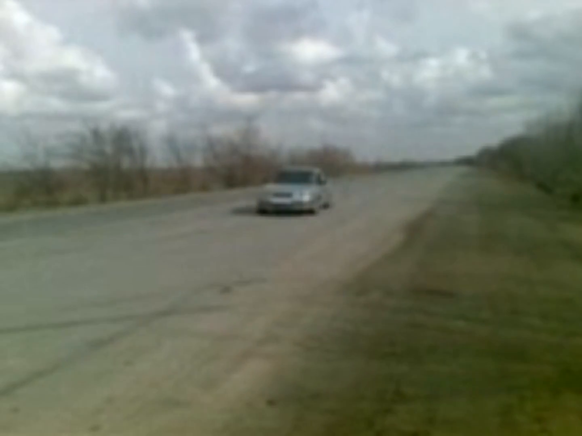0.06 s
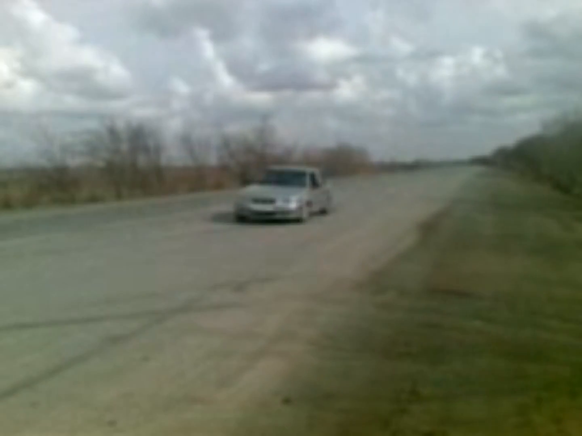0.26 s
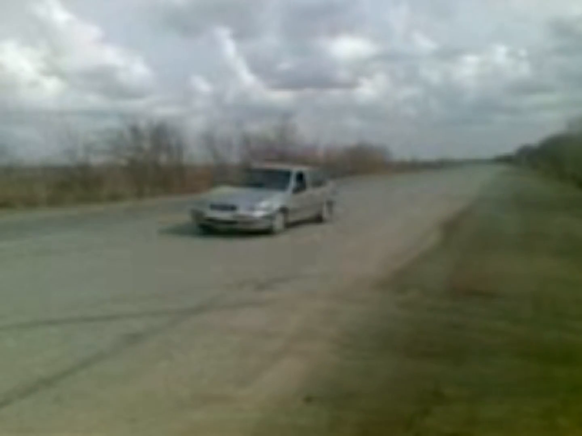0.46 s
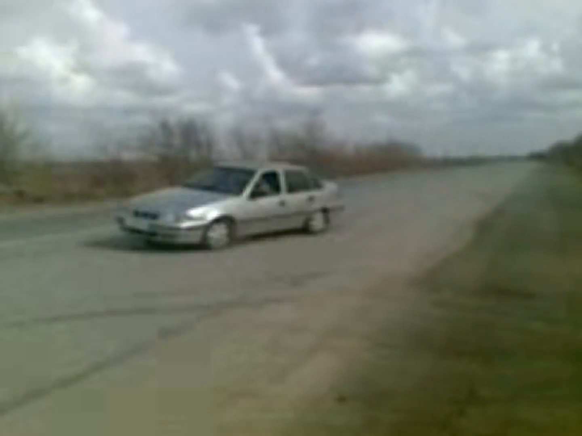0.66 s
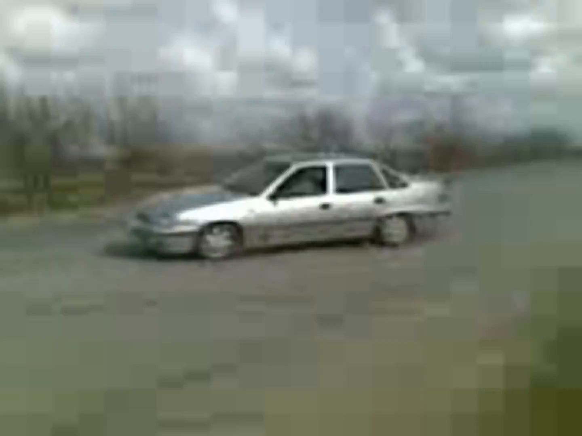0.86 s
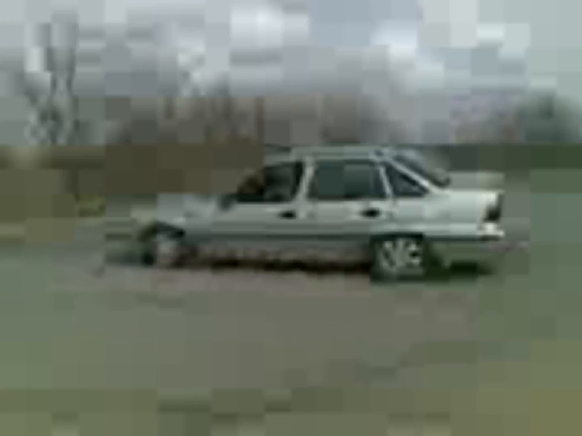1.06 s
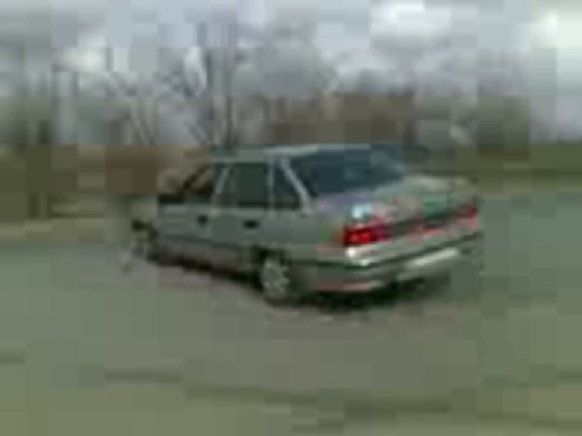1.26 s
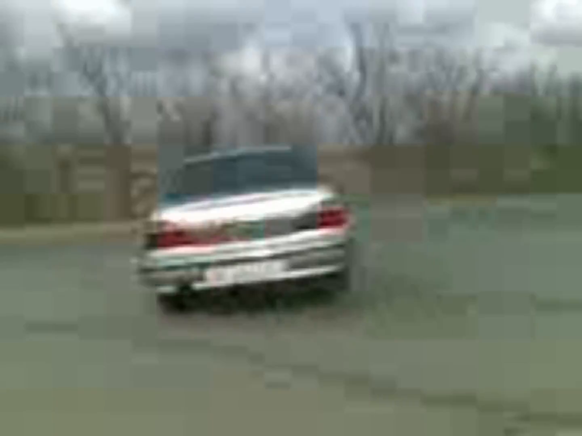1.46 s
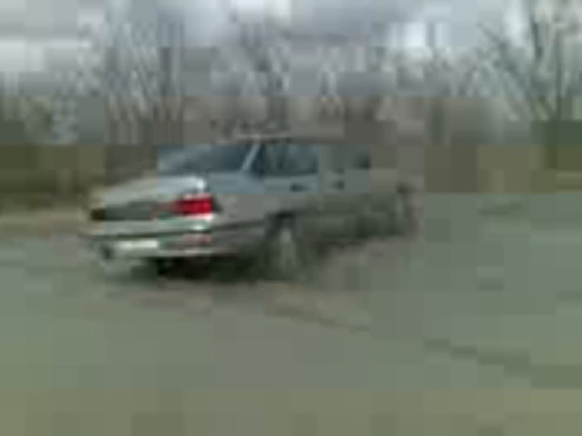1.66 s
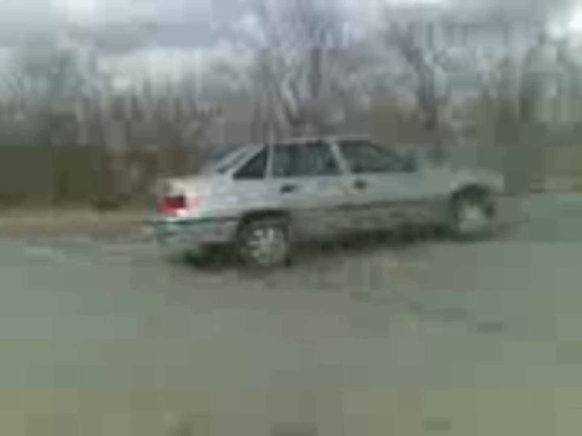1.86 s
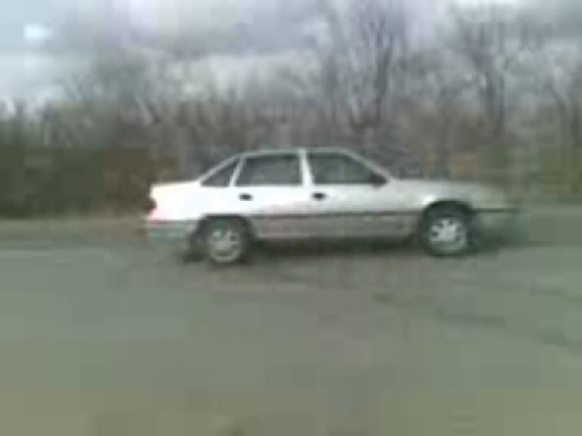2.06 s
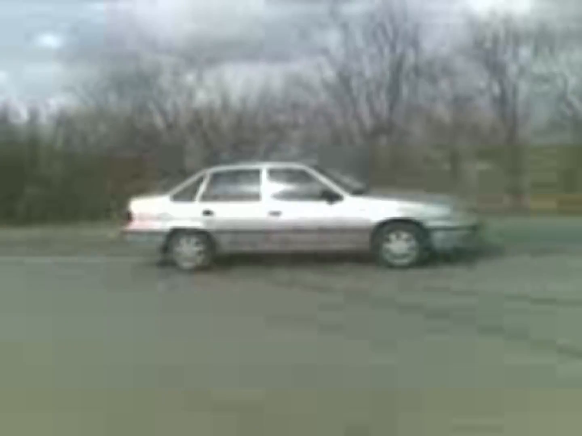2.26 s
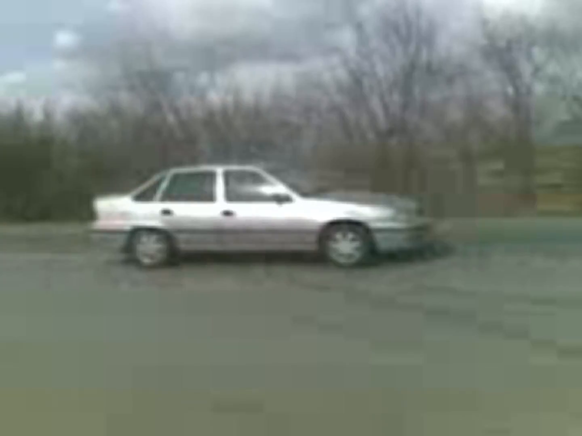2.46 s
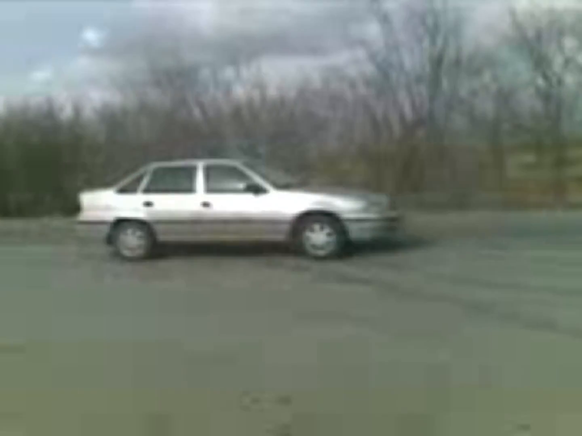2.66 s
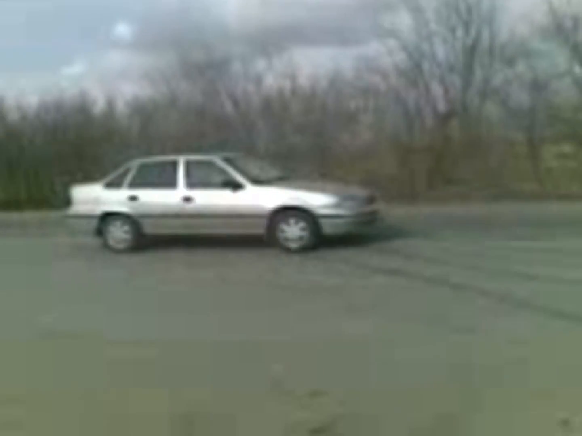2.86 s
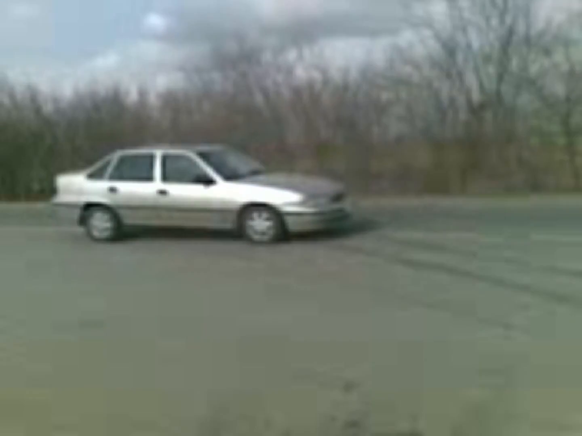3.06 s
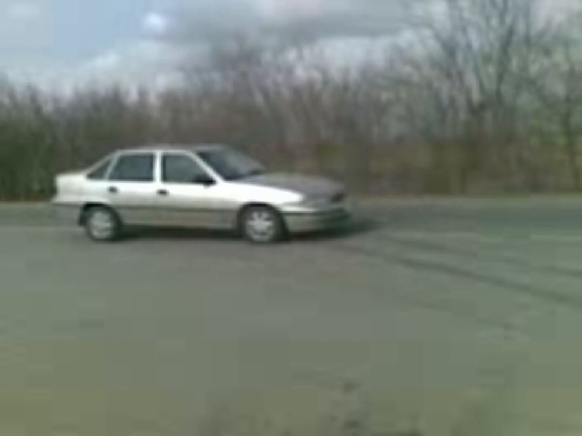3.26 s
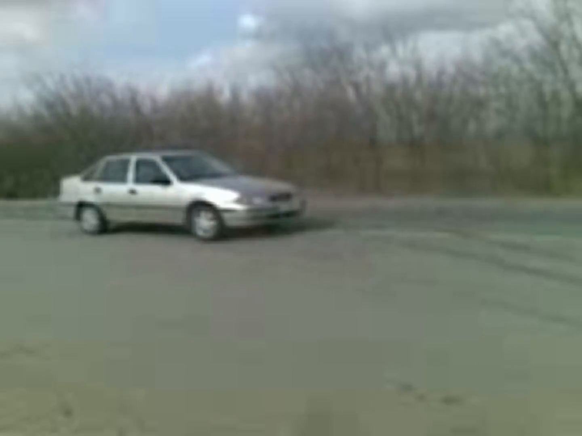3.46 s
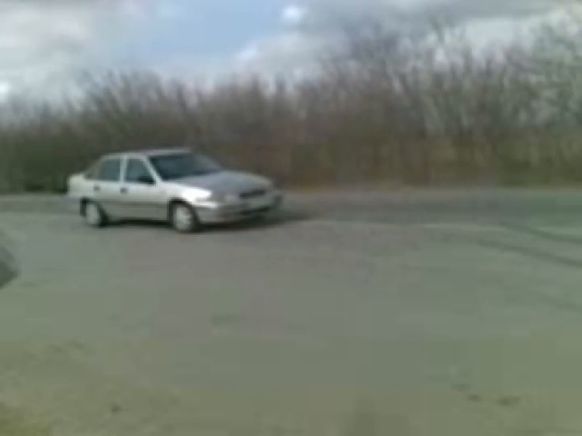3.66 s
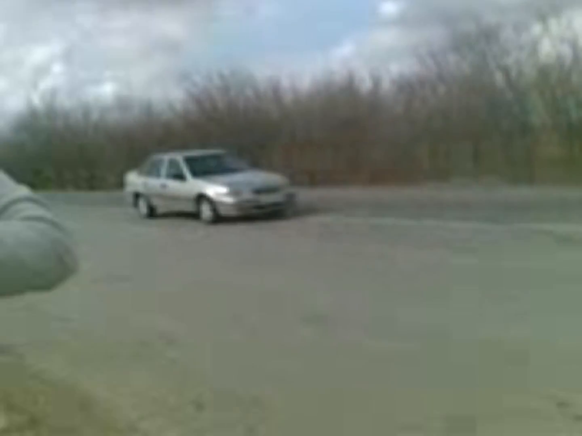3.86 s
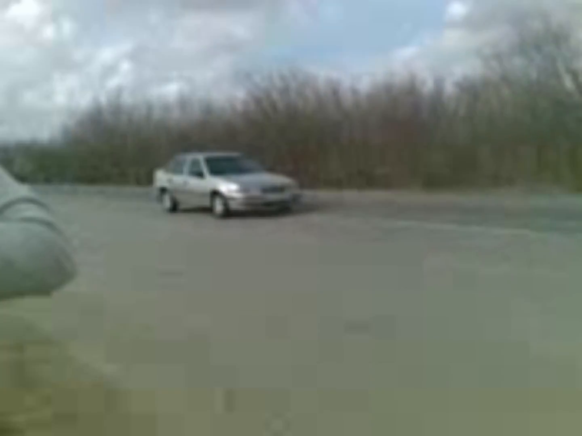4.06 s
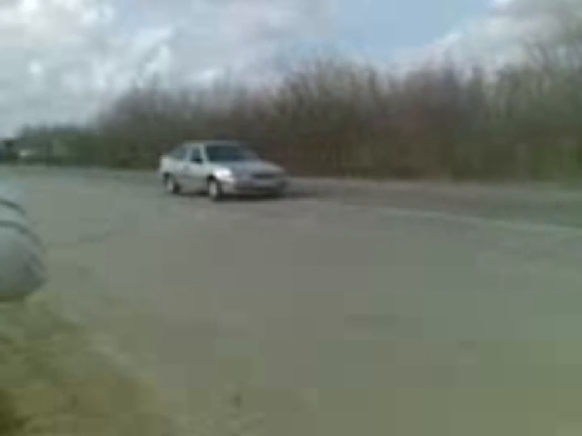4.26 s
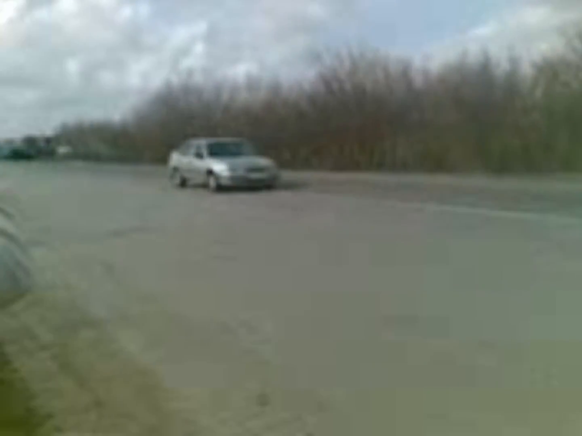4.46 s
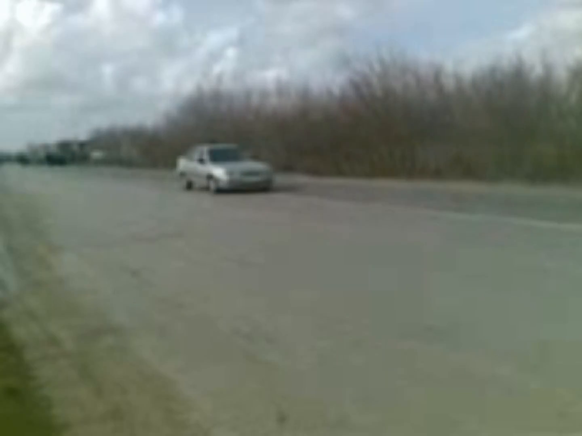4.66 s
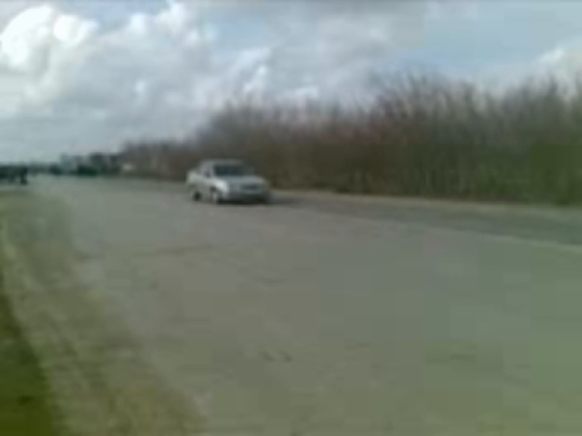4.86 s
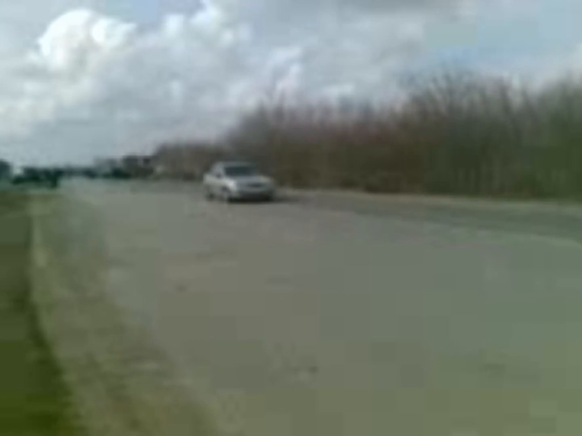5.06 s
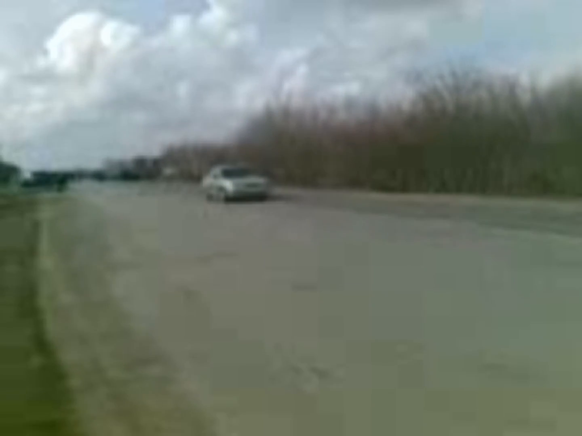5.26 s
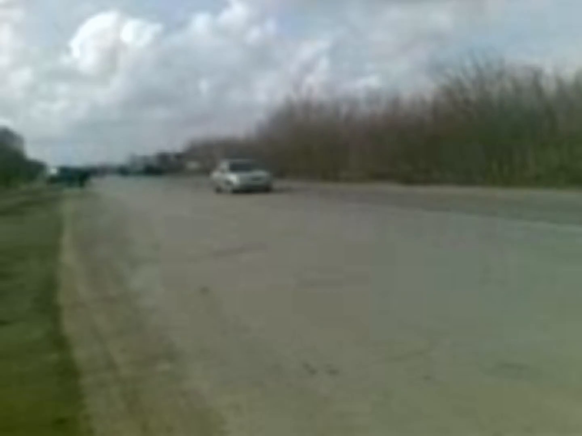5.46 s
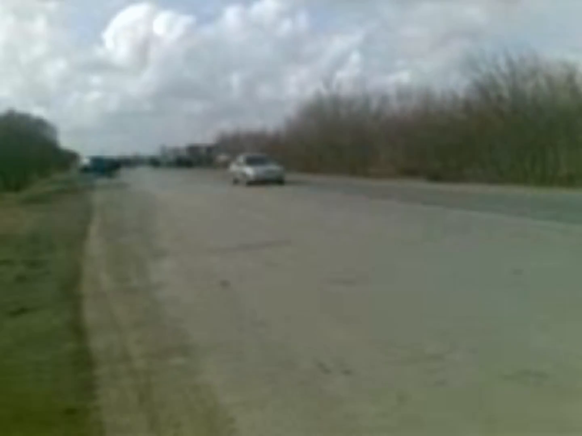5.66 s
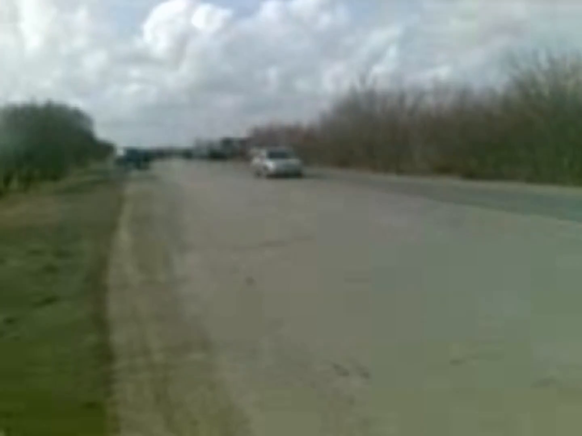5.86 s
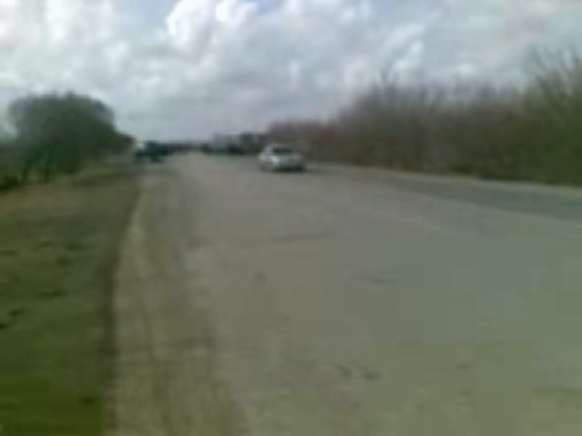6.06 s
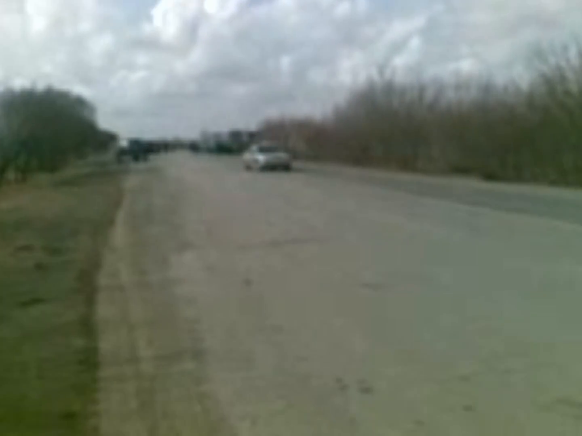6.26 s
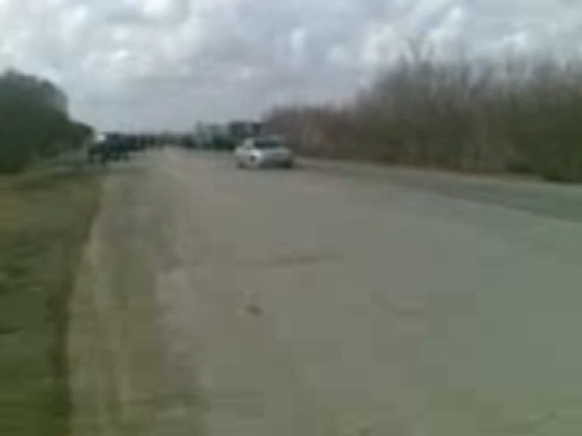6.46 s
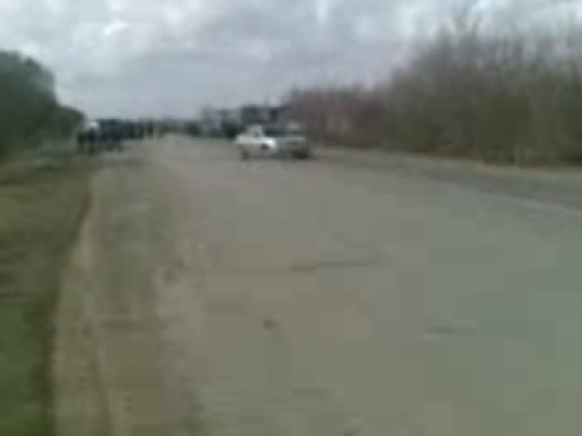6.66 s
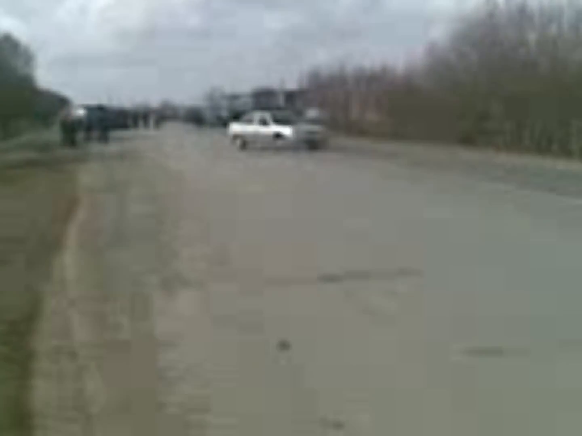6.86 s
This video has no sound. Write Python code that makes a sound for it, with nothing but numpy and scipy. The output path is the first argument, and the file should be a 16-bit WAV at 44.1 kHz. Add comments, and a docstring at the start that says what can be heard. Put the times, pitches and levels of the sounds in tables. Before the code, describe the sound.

Loud tyre screeching and rubbing fill the first two seconds, uneven and fluttering, with several short flares just before the stop. Quiet squeaks, scuffs and buzzy gear grabs follow, then a soft, flickering reverse whine climbs in pitch and thins out over faint road roll and engine hum. Near the end a squeal bursts in and sustains. Outdoors, dry, captured by a narrow-band camera microphone with gritty treble.

```python
"""Car spin and fast reverse

Tyres squeal and scrub in a spin on a country road: rubber slips ring briefly over shaped road noise.
The car stops on brake squeaks and backs away: reverse-gear multiples whine over the engine hum.
The tyres break loose again far off. A small camera's 8 kHz sampling adds mirror images above 4 kHz."""
import sys
import numpy as np
from scipy import signal
from scipy.fft import rfft, irfft, next_fast_len
from scipy.io import wavfile
from scipy.ndimage import uniform_filter1d, map_coordinates

SR = 44100
rng = np.random.default_rng(int(sys.argv[2]) if len(sys.argv) > 2 else 0)


def unload_audio(sound):
    """Save the sound as a 16-bit wav file, at the path given as the first command line argument."""
    columns = np.transpose(np.atleast_2d(sound))
    # keep every value between -1 and 1, then stretch to whole-number steps
    steps = np.round(np.clip(columns, -1, 1) * 32767)
    wavfile.write(sys.argv[1], SR, steps.astype(np.int16))


N = 304731
TIME_S = np.arange(N) / SR

# Sliding tyres, levels before trim: (time [s], squeal [Hz], squeal level [dB], overtone level [dB])
FRONT_SLIDE = [(0.0, 1628, -26, -25), (0.07, 1309, -31.5, -29), (0.2, 1460, -30, -25.5),
               (0.29, 1372, -28.5, -19), (0.37, 1370, -20.5, -20), (0.6, 1236, -27.5, -22.5),
               (0.75, 1203, -32.5, -21), (0.92, 1410, -36.5, -29.5), (1.24, 1350, -37, -30.5),
               (1.33, 1233, -28, -41.5), (1.45, 1390, -53, -54.5), (1.56, 1482, -40.5, -30.5),
               (1.8, 1423, -46, -30)]
REAR_SLIDE = [(0.38, 1059, -28.5, -44), (0.49, 1074, -24.5, -41.5), (0.82, 890, -29, -37),
              (0.94, 953, -22.5, -26.5), (1.19, 870, -22.5, -28), (1.29, 951, -21, -27),
              (1.41, 880, -24.5, -41), (1.5, 914, -33.5, -39.5), (1.63, 1074, -25.5, -22.5),
              (1.72, 858, -32.5, -29), (1.87, 970, -32.5, -27), (1.99, 1001, -37, -43),
              (2.05, 1110, -39, -34.5), (2.22, 1214, -39, -35.5), (2.36, 1168, -62.5, -70.5)]
FAR_SLIDE = [(6.005, 1255, -72.5, -37), (6.025, 1217, -32.5, -24), (6.058, 1140, -17, -29.5),
             (6.096, 1256, -35, -24), (6.12, 1277, -26.5, -26), (6.34, 1257, -24, -27.5),
             (6.64, 1219, -29.5, -27), (6.91, 1276, -29, -30.5)]
# Rubber bites and the squeal flares: (time [s], amplitude added relative to the slide [dB])
BITES = [(0.012, 2.5), (0.053, 2), (0.079, 2.5), (0.088, 1), (0.101, 5.5), (0.191, -4.5), (0.232, 9),
         (0.268, -4), (0.3, -0.5), (2.04, -0.5), (2.064, 0), (2.088, 5.5), (2.135, 6.5), (2.152, 10.5),
         (2.182, 7.5), (2.197, 9), (2.233, 10.5), (2.259, 5)]
# Road noise, levels before trim: (time [s], scrub level [dB], body drone level [dB])
ROAD_LEVELS = [(0, -40.5, -67), (.25, -37, -54.5), (.54, -30.5, -46.5), (1.2, -32.5, -44.5),
               (1.65, -32, -45.5), (1.98, -46.5, -57), (2.05, -37, -56), (2.23, -45, -59.5),
               (2.28, -62.5, -87), (2.37, -71, -89), (2.46, -61.5, -61), (2.65, -69, -67),
               (2.7, -69.5, -56.5), (2.76, -59.5, -57), (3.0, -51, -60), (3.65, -54.5, -56.5),
               (4.1, -48, -47.5), (4.3, -57.5, -62), (4.65, -63, -66), (5.3, -69.5, -73), (5.7, -62, -70),
               (5.99, -62.5, -70.5), (6.03, -32.5, -53), (6.91, -32, -55)]
# Relative spectra of loud scrub, quiet rolling and body drone: (frequency [Hz], density [dB per Hz])
SCRUB_SPECTRUM = [(240, -51), (400, -38), (748, -16), (961, -10), (1190, -5), (1630, -4), (2060, -4),
                  (3530, -4.5), (4000, -13.5), (5200, -56), (8800, -120)]
ROLL_SPECTRUM = [(180, -10.5), (300, -18.5), (706, 1), (840, -8.5), (936, -2.5), (3440, -2.5), (4000, -9),
                 (5200, -51.5), (8800, -120)]
DRONE_SPECTRUM = [(15, -66.5), (25, -27), (96, -18.5), (192, -18.5), (241, -16), (565, -13), (900, -12),
                  (1170, -23.5), (1980, -120)]
# The car lurches and the tyres scuff: (start [s], length [s], level before trim [dB])
LURCHES = [(2.369, 0.079, -42.5), (2.771, 0.058, -52.5), (2.869, .13, -48.5)]
# Dull knocks: (time [s], level before trim [dB])
KNOCKS = [(0.232, -53), (0.264, -46)]
# One tread rib's steadier notes, one list per note: (time [s], pitch [Hz], mean level [dB])
RIB_NOTES = [
    [(1.38, 1707, -59), (1.396, 1700, -40), (1.544, 1873, -29), (1.74, 1920, -41), (1.76, 1650, -61)],
    [(6.012, 2556, -32.5), (6.044, 2154, -27.5), (6.098, 2190, -27.5), (6.12, 2340, -54)],
]
# Highest squeal strand, one list per slide: (time [s], pitch [Hz], level before trim [dB])
SHRILL_STRANDS = [
    [(1.8, 3080, -31.5), (1.946, 2907, -46.5), (2.02, 3050, -38.5), (2.22, 2700, -58), (2.3, 2600, -62.5)],
    [(6.0, 2656, -49.5), (6.03, 2992, -37.5), (6.13, 3068, -26), (6.5, 2807, -35.5), (6.58, 2838, -27.5),
     (6.77, 2880, -27.5), (6.91, 2814, -22.5)],
]
# Brake squeaks: (time [s], pitch [Hz], level [dB])
BRAKE_SQUEAKS = [(2.505, 1050, -55.5), (2.544, 1030, -53)]
# Clutch grabs: (start [s], length [s], tooth rate [Hz], level [dB], loudest multiple [tooth rates],
# loss per multiple above the loudest [dB])
CLUTCH_GRABS = [(2.659, 0.085, 570, -63, .9, 3), (2.763, 0.099, 601.4, -48.5, 3.1, 2),
                (2.866, 0.099, 593, -46, 3.1, 4), (2.903, 0.089, 639, -40, 1.9, 7.5),
                (2.958, 0.077, 654, -48, 2.6, 2.5)]
# Reverse gear pulling: (time [s], tooth rate [Hz])
TOOTH_RATE = [(3.04, 487), (3.12, 464.8), (3.2, 474.4), (3.35, 572.5), (3.5, 590.5), (3.64, 624),
              (3.7, 663), (3.8, 689.5), (3.97, 716.4), (4.12, 773.4), (4.2, 801.6), (4.31, 842.5),
              (4.45, 870), (4.56, 885), (4.64, 940), (4.92, 973)]
# Multiples of the tooth rate: one column (multiple [-])
TOOTH_MULTIPLES = [.5, 1, 2, 3, 4, 5, 6, 7]
# Whine spells, one list per multiple: (start [s], length [s], level before flicker [dB])
WHINE_SPELLS = [
    [(3.0, 0.18, -66.5), (3.35, 0.29, -63.5), (3.99, 0.18, -55)],
    [(3.15, 0.18, -64.5), (3.35, 0.33, -55), (3.63, 0.2, -57), (3.88, .26, -45.5), (4.14, .18, -60),
     (4.38, .08, -60), (4.62, 0.3, -57)],
    [(3.04, 0.17, -58.5), (3.36, 0.18, -52), (3.63, .11, -56.5), (3.77, 0.2, -48.5), (4.08, 0.23, -44),
     (4.57, .22, -65.5)],
    [(3.03, 0.21, -51), (3.34, 0.23, -51), (3.56, .1, -68), (3.67, 0.22, -45.5), (3.78, .29, -37.5),
     (4.06, 0.18, -44.5), (4.3, 0.36, -57.5), (4.57, 0.38, -68.5)],
    [(3.03, 0.16, -47.5), (3.33, .26, -46), (3.58, 0.12, -53.5), (3.72, 0.32, -49), (3.96, .18, -40.5),
     (4.12, .19, -46.5), (4.32, .25, -59.5), (4.57, .28, -66.5)],
    [(3.03, 0.21, -47.5), (3.29, 0.17, -58), (3.41, 0.24, -51), (3.72, 0.054, -59), (3.79, .22, -51)],
    [(3.05, 0.12, -54), (3.22, 0.16, -67), (3.34, 0.33, -58)],
    [(3.06, .12, -53), (3.18, 0.14, -63.5)],
]
# Engine hum swells: (start [s], length [s], first pitch [Hz], last pitch [Hz], level [dB])
HUM_SWELLS = [(3.864, .32, 224, 269, -55), (4.15, 0.52, 265.6, 311, -68), (5.005, 0.33, 207, 181, -76),
              (5.225, 0.33, 181, 212, -80), (5.55, 0.42, 220.6, 233, -71.5)]
# Engine orders: (multiple of the hum [-], level relative to the swell [dB])
ENGINE_ORDERS = [(1, 1.5), (2, -14.5), (4, -16.5)]
# Converter input filter below half the sampling rate: (frequency [Hz], gain [dB])
INPUT_FILTER = [(3400, 1), (3700, 2.5), (3900, -5), (4000, -1)]
# Strength of the sampling images: (frequency [Hz], gain [dB])
IMAGE_GAIN = [(4000, -2), (4500, -8.5), (5000, -21.5), (5400, -32.5), (5900, 6.5), (6700, -3),
              (8000, -23.5), (9200, -16.5), (11500, 5.5), (13400, 11), (14700, -11.5), (15300, -23.5)]

FRONT_RATIO, REAR_RATIO, FAR_RATIO = 1.93, 2.02, 1.77  # overtone over squeal
BITE_S = 0.0063
LURCH_DRONE_DB = -9.5  # relative to the scuff
BELOW_STEEPER = 2  # loss factor below the loudest multiple
CEILING = 0.29  # full scale = 1
SAMPLING_HZ, BASS_CUT_HZ = 8000, 45
TOP_HZ, LEAK_DB = 5426, -59  # last filter's edge and its gain above it


def amp(db):
    """Amplitude from decibels."""
    return 10 ** (np.asarray(db) / 20)


def unit(x):
    """Scale to rms 1."""
    return x / np.sqrt(np.mean(np.abs(x) ** 2) + 1e-20)


def along(points, hz):
    """Interpolate (Hz, value) points on a log frequency axis."""
    point_hz, values = np.transpose(points)
    return np.interp(np.log(hz + 1), np.log(point_hz + 1), values)


def curves(rows):
    """One per-sample curve for each column after the time."""
    knot_s, *columns = np.transpose(rows)
    return [np.interp(TIME_S, knot_s, column) for column in columns]


def gate(rows):
    """1 while the table lasts, with 15 ms fades outside its ends."""
    inside_s = np.minimum(TIME_S - rows[0][0], rows[-1][0] - TIME_S)
    return np.clip(inside_s / 0.015 + 1, 0, 1)


def swell(start_s, length_s, peakedness):
    """One rise and fall; small peakedness makes it flat-topped."""
    phase = np.clip((TIME_S - start_s) / length_s, 0, 1)
    return np.sin(np.pi * phase).clip(0) ** peakedness


def wobble(knots_hz):
    """Smooth random curve of rms 1 through knots_hz random knots per second."""
    coarse_s = TIME_S[::16]
    knots = rng.standard_normal(int(N * knots_hz / SR) + 4)
    return np.interp(TIME_S, coarse_s, unit(map_coordinates(knots, [coarse_s * knots_hz])))


def filtered(x, response):
    """Multiply the spectrum by a response of frequency."""
    size = next_fast_len(N + SR // 2)
    return irfft(rfft(x, size) * response(np.fft.rfftfreq(size, 1 / SR)), size)[:N]


def shaped(noise, spectrum):
    """Noise given a tabled spectrum, at rms 1."""
    return unit(filtered(noise, lambda hz: amp(along(spectrum, hz))))


def patchy(depth_db):
    """Noise whose strength changes in small patches of time and pitch."""
    bins = signal.stft(rng.standard_normal(N), nperseg=512)[2]
    field = uniform_filter1d(rng.standard_normal(bins.shape), size=3, axis=0)
    field = uniform_filter1d(field, size=7, axis=1)
    return signal.istft(bins * amp(depth_db * unit(field)), nperseg=512)[1][:N]


def tone(hz):
    """Sine of rms 1 following a frequency curve."""
    return np.sqrt(2) * np.sin(2 * np.pi * np.cumsum(hz) / SR)


def slips(rows, pitches_hz, spread, rate_hz, life_s, size_db):
    """Contacts slip at random moments; each rings briefly near all the given pitches at once."""
    draw = rng.random((int((rows[-1][0] - rows[0][0]) * 900), 4))
    gaps_s = -np.log(1 - draw[:, 0]) / rate_hz
    start = (rows[0][0] + np.cumsum(gaps_s)) * SR
    keep = start < min(rows[-1][0] * SR, N)
    start, draw = start[keep].astype(int), draw[keep]
    ring_s = np.arange(SR // 25) / SR
    detune = 1 + spread * np.log(draw[:, 1] / (1 - draw[:, 1]))
    envelope = (ring_s / life_s) * np.exp(-ring_s / life_s)
    shape = amp(size_db * draw[:, 2])[:, None] * envelope
    where = (start[:, None] + np.arange(len(ring_s))).ravel()
    bands = []
    for hz in pitches_hz:
        cycles = (hz[start] * detune)[:, None] * ring_s + draw[:, 3:]
        rings = shape * np.sin(2 * np.pi * cycles)
        band = np.bincount(where, rings.ravel(), N + len(ring_s))[:N]
        bands.append(band / np.std(band[start[0]:start[-1]]))
    return bands


def tyres(rows, ratio, spread, rate_hz, life_s):
    """Tread blocks let go: squeal and overtone bands share the same slips and flare at each bite."""
    hz, squeal_db, overtone_db = curves(rows)
    squeal, overtone = slips(rows, [hz, ratio * hz], spread, rate_hz, life_s, size_db=9)
    flare = 1 + sum(amp(db) * np.exp(-((TIME_S - s) / BITE_S) ** 2) for s, db in BITES)
    mix = amp(squeal_db - 1.6) * squeal + amp(overtone_db - 5.0) * overtone
    return gate(rows) * flare * mix


def road():
    """Loud scrub is gritty and patchy, quiet rolling smoother; the body drones under both."""
    scrub_db, drone_db = curves(ROAD_LEVELS)
    scuff = sum(amp(db) * swell(s, length_s, peakedness=1.9) for s, length_s, db in LURCHES)
    rubber = amp(scrub_db) + scuff
    sliding = np.clip((20 * np.log10(rubber) + 62.5) / 14, 0, 1)  # 0 rolling, 1 scrubbing
    grit = amp(0.45 * wobble(13) + 1.4 * wobble(50)) * patchy(depth_db=4.0)
    scrub = shaped(grit, SCRUB_SPECTRUM)
    roll = shaped(patchy(depth_db=3.8), ROLL_SPECTRUM)
    drone = shaped(rng.standard_normal(N), DRONE_SPECTRUM)
    contact = np.sqrt(sliding) * scrub + amp(1.5) * np.sqrt(1 - sliding) * roll
    drone_level = (amp(drone_db) + amp(LURCH_DRONE_DB) * scuff) * amp(0.41 * wobble(11))
    return amp(2.5) * rubber * contact + drone_level * drone


def knocks():
    """Each dull knock is one short push and its weaker rebound."""
    out = 0
    for s, db in KNOCKS:
        u = np.clip(TIME_S - s, 0, 1) / 0.00073
        out = out + amp(db + 8) * u * (2 - u) * np.exp(-u)
    return out


def rib_notes():
    """One tread rib holds a narrow note, wavering in pitch and level."""
    out = 0
    for rows in RIB_NOTES:
        hz, db = curves(rows)
        level = gate(rows) * amp(db + 4.6 * wobble(45))
        out = out + level * tone(hz * (1 + 0.013 * wobble(80)))
    return out


def shrill():
    """Widely detuned slips make a broad, ragged strand on top of the squeal."""
    out = 0
    for rows in SHRILL_STRANDS:
        hz, db = curves(rows)
        band, = slips(rows, [hz], spread=0.059, rate_hz=400, life_s=0.0052, size_db=8.0)
        out = out + amp(db - 2.0) * band
    return out


def brakes():
    """Short tone bursts with an octave squeak as the car comes to rest."""
    out = 0
    for s, hz, db in BRAKE_SQUEAKS:
        pitch_hz = np.full(N, hz)
        burst = amp(db) * np.exp(-((TIME_S - s) / 0.014) ** 2)
        out = out + burst * (tone(pitch_hz) + amp(-7) * tone(2 * pitch_hz))
    return out


def clutch_grabs():
    """Tooth contacts slip raggedly as the clutch grabs, giving a stack of multiples."""
    pitch = [(s, hz) for s, _, hz, *_ in CLUTCH_GRABS]
    pitch.append((TOOTH_RATE[0][0], CLUTCH_GRABS[-1][2]))
    hz, = curves(pitch)
    bands = slips(pitch, [k * hz for k in TOOTH_MULTIPLES],
                  spread=0.023, rate_hz=770, life_s=0.013, size_db=21)
    out = 0
    for s, length_s, _, db, loudest, loss_db in CLUTCH_GRABS:
        envelope = swell(s, length_s, peakedness=1.7)
        for k, band in zip(TOOTH_MULTIPLES, bands):
            steepness = BELOW_STEEPER if k < loudest else 1
            out = out + envelope * amp(db - loss_db * abs(k - loudest) * steepness) * band
    return out


def gear_whine():
    """Straight-cut teeth mesh: flickering multiples of the tooth rate sing in spells."""
    hz, = curves(TOOTH_RATE)
    out = 0
    for k, spells in zip(TOOTH_MULTIPLES, WHINE_SPELLS):
        level = sum(amp(db) * swell(s, length_s, peakedness=0.45) for s, length_s, db in spells)
        flicker = amp(1.3 * wobble(18) + 2.2 * wobble(70))
        out = out + level * flicker * tone(k * hz * (1 + 0.005 * wobble(120)))
    return out


def engine():
    """A low hum and its weaker multiples swell, unsteady in pitch and level."""
    out = 0
    for s, length_s, first_hz, last_hz, db in HUM_SWELLS:
        hz = np.interp(TIME_S, [s, s + length_s], [first_hz, last_hz])
        envelope = swell(s, length_s, peakedness=0.52)
        for k, order_db in ENGINE_ORDERS:
            level = envelope * amp(db + order_db + 1.9 * wobble(17))
            out = out + level * tone(k * hz * (1 + 0.01 * wobble(40)))
    return out


def scene():
    """Sum of all sources."""
    front = tyres(FRONT_SLIDE, FRONT_RATIO, spread=0.03, rate_hz=350, life_s=0.0025)
    rear = tyres(REAR_SLIDE, REAR_RATIO, spread=0.038, rate_hz=500, life_s=0.0042)
    far = tyres(FAR_SLIDE, FAR_RATIO, spread=0.03, rate_hz=500, life_s=0.0045)
    rubber = front + rear + far + road() + knocks() + rib_notes() + shrill()
    machinery = brakes() + clutch_grabs() + gear_whine() + engine()
    return (rubber + machinery)[None]


def record(dry):
    """Squeeze peaks, cut at half the sampling rate, add images around the rate and its double."""
    half_hz = SAMPLING_HZ / 2
    squeezed = dry[0] / (1 + np.abs(dry[0] / CEILING) ** 3) ** (1 / 3)

    def input_response(hz):
        bass_cut = hz ** 2 / (hz ** 2 + BASS_CUT_HZ ** 2)
        return amp(along(INPUT_FILTER, hz)) * (hz < half_hz) * bass_cut

    def image_response(hz):
        return amp(along(IMAGE_GAIN, hz)) * (hz > half_hz) * (hz < IMAGE_GAIN[-1][0])

    kept = filtered(squeezed, input_response)
    turn = 2 * np.pi * SAMPLING_HZ * TIME_S
    images = filtered(2 * kept * (np.cos(turn) + np.cos(2 * turn)), image_response)
    return filtered(kept + images, lambda hz: np.where(hz < TOP_HZ, 1, amp(LEAK_DB)))[None]


dry = scene()
out = record(dry)
unload_audio(out)
```